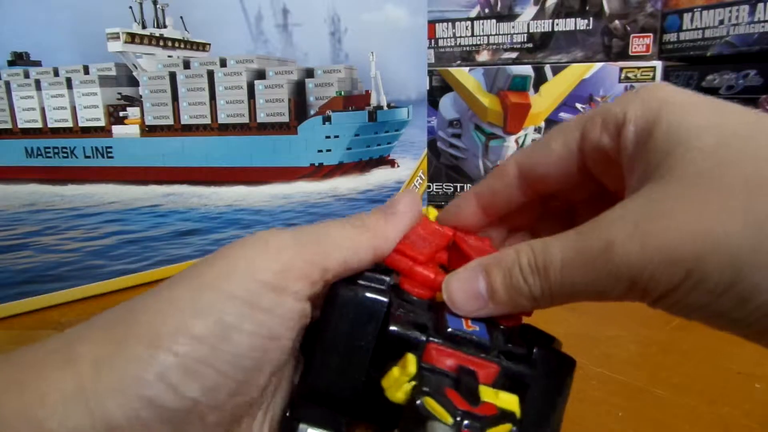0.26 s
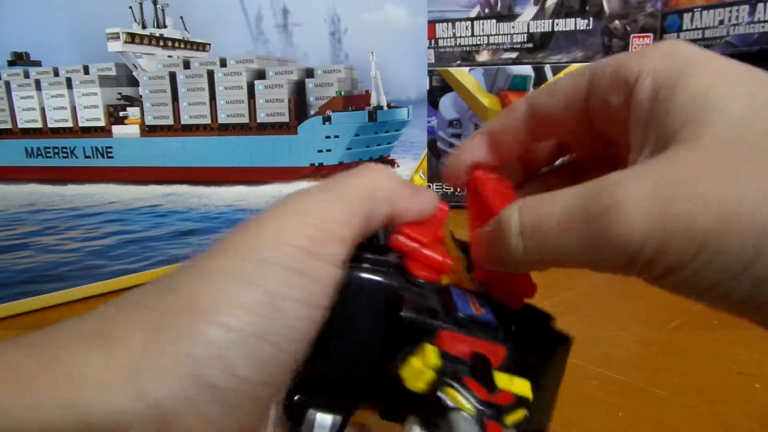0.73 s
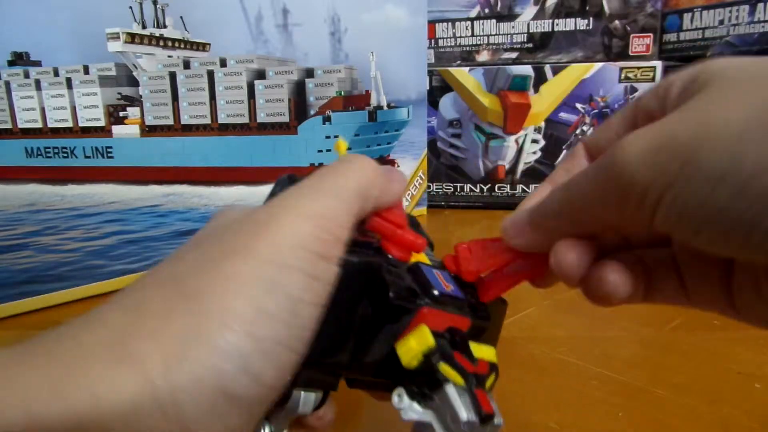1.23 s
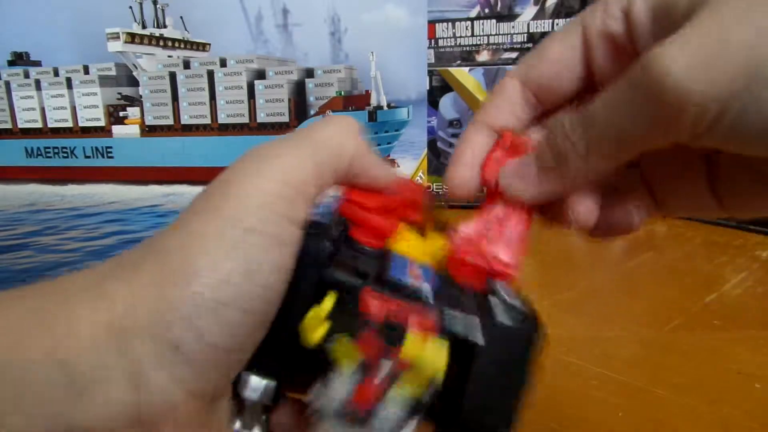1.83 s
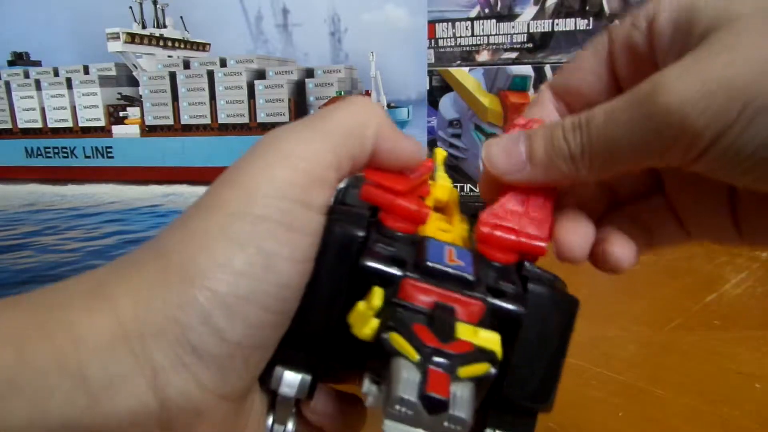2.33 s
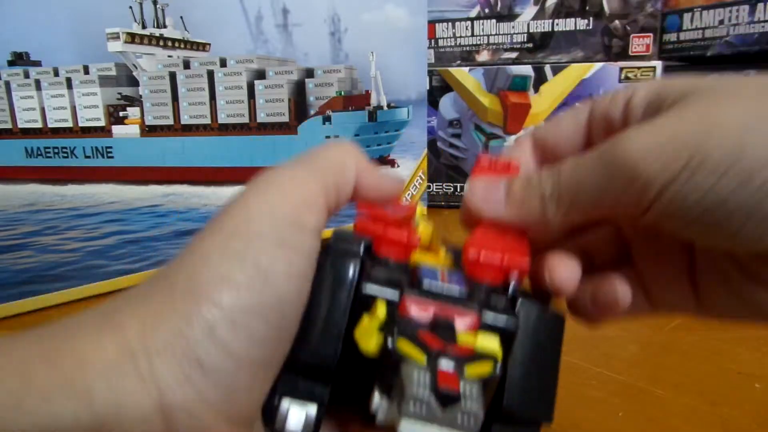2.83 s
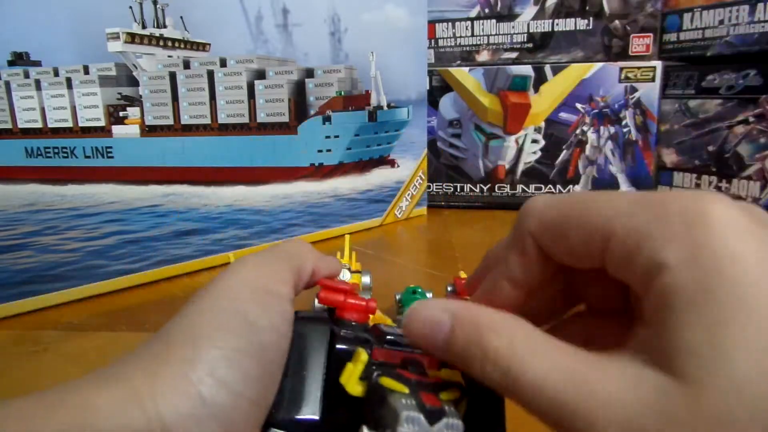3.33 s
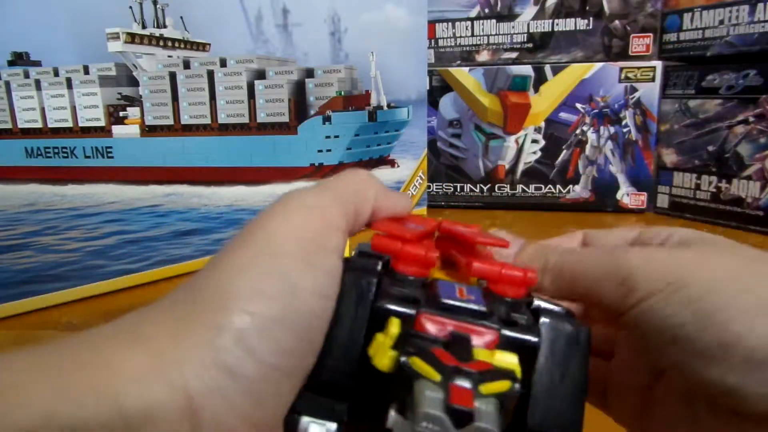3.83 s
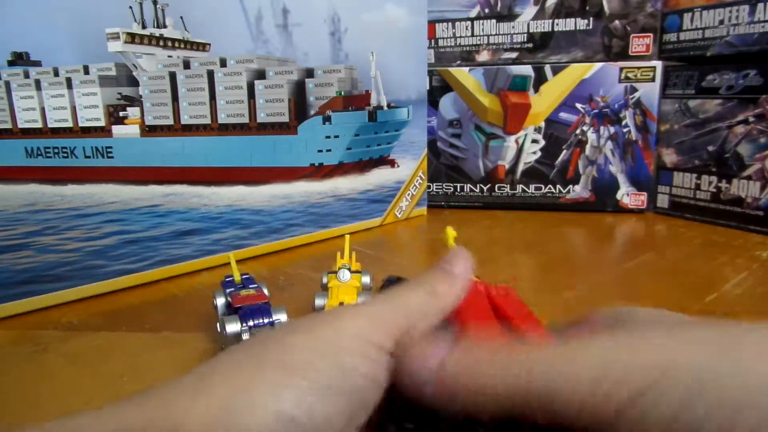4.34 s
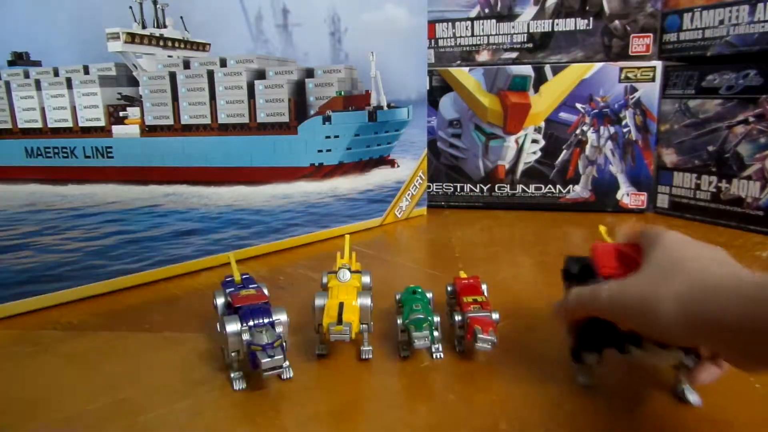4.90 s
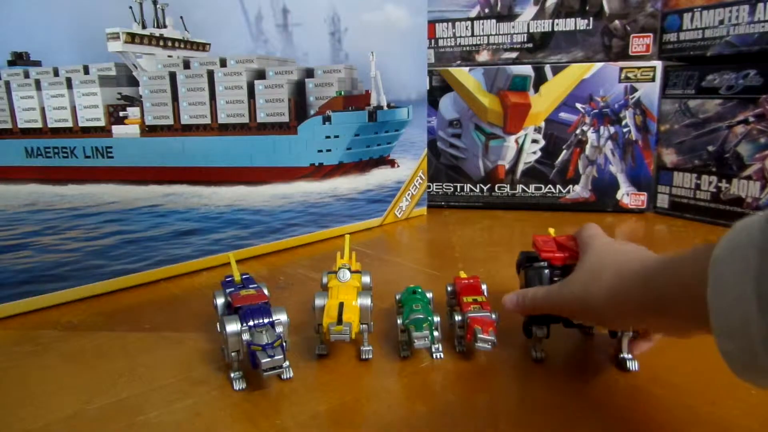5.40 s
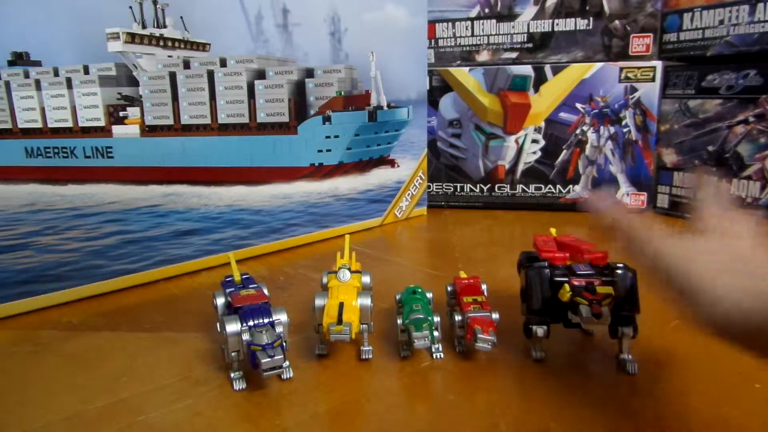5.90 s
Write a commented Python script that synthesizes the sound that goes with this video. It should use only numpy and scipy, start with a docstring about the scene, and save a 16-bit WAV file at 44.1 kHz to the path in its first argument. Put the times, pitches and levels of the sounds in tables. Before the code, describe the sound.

Close small plastic clicks and faint finger rubbing, a sharp loud snap, a few softer clicks, then hollow wooden knocks with a tiny low squeak.

```python
"""Folding a plastic toy and standing it on a table

Hands fold a hard plastic toy close to a camera: its joints tick and click, and one part snaps home loudly.
Each click is a burst of noise with ringing shell tones; rubbing fingers are noise with tiny catches.
The toy is then stood on a wooden table: its feet knock (ringing wood tones), skid with a low squeak and settle.
A small room answers clicks and knocks; a noise suppressor lets the hiss up after sounds and slowly shuts."""
import sys
import numpy as np
from scipy import signal
from scipy.fft import rfft, irfft, next_fast_len
from scipy.io import wavfile
from scipy.ndimage import uniform_filter1d, map_coordinates

SR = 44100
rng = np.random.default_rng(int(sys.argv[2]) if len(sys.argv) > 2 else 0)


def wav_out(sig):
    """Save sig, one row per channel (or a flat mono array), as 16-bit PCM at SR to the path in sys.argv[1]."""
    wavfile.write(sys.argv[1], SR, np.round(np.clip(np.atleast_2d(sig).T, -1, 1) * 32767).astype(np.int16))


N = 271523  # length in samples

# Fingers rubbing over the toy. Each row: start in seconds, length in seconds,
# level in dB (before the function that uses it adds its own level).
STROKES = [(0, 0.016, -52.5), (.06, 0.055, -60.5), (.27, 0.053, -69), (.58, 0.5, -59.5),
           (1.27, 0.0086, -60.5), (1.45, 0.19, -61.5), (2.0, 0.14, -72), (3.05, 0.65, -64),
           (4.28, 0.15, -60.5), (4.58, .12, -60)]
# Feet dragging over the table. Each row: start in seconds, length in seconds,
# rumble level in dB, scrape level in dB (both before an overall level is added).
DRAGS = [(5.02, 0.33, -44, -55.5), (5.44, .12, -60.5, -67), (5.777, 0.093, -51, -60.5)]


def amp(db):
    """Turn decibels into a gain."""
    return 10 ** (np.asarray(db) / 20)


def unit(x):
    """Scale to an average (rms) strength of 1."""
    return x / np.sqrt(np.mean(x ** 2) + 1e-20)


def strike(x, length):
    """Scale a blow to rms 1 over its first length seconds."""
    return x / np.sqrt(np.mean(x[:round(length * SR)] ** 2))


def along(points, hz):
    """Read a curve of (Hz, value) points on a logarithmic pitch axis."""
    point_hz, value = np.transpose(points)
    return np.interp(np.log(hz + 1), np.log(point_hz + 1), value)


def curves(rows):
    """One value per sample for each column; the last becomes a gain, silent outside the rows."""
    s, *columns, db = np.transpose(rows)
    t = np.arange(N) / SR
    inside = (t >= s[0]) * (t <= s[-1])
    return [np.interp(t, s, column) for column in columns] + [amp(np.interp(t, s, db)) * inside]


def filtered(x, response):
    """Multiply the spectrum of x by a response that depends on frequency."""
    m = next_fast_len(len(x) + 8192)
    return irfft(rfft(x, m) * response(np.fft.rfftfreq(m, 1 / SR)), m)[:len(x)]


def coloured(x, gain_db, size=4096):
    """Colour a sound with a causal (minimum-phase) filter: nothing sounds before the blow."""
    cepstrum = irfft(np.log(amp(gain_db(np.fft.rfftfreq(size, 1 / SR)))))
    # folding the second half onto the first moves the response after time zero
    cepstrum[1:size // 2] *= 2
    cepstrum[size // 2 + 1:] = 0
    impulse = irfft(np.exp(rfft(cepstrum)))
    return signal.fftconvolve(x, impulse)[:len(x)]


def noise(spectrum):
    """Noise of rms 1 with the given spectrum."""
    return unit(filtered(rng.standard_normal(N), lambda hz: amp(along(spectrum, hz))))


def wobble(rate):
    """A smooth random curve with rate random points a second."""
    points = rng.standard_normal(int(N * rate / SR) + 4)
    return map_coordinates(points, [np.arange(N) * rate / SR])


def add(track, s, sound):
    """Mix a sound into the track at s seconds."""
    part = track[max(round(s * SR), 0):][:len(sound)]
    part += sound[:len(part)]


def slide_level(slides):
    """Gain of (start s, length s, dB) slides: each swells, holds and dies away."""
    attack_db_per_s, release_db_per_s = 898, 139
    t = np.arange(N) / SR
    level = np.zeros(N)
    for start, length, db in slides:
        before = np.maximum(start - t, 0)
        after = np.maximum(t - start - length, 0)
        level += amp(db - attack_db_per_s * before - release_db_per_s * after)
    return level


def in_room(x, wet_db, delay=.009):
    """Add the tail from nearby boxes and walls: noise whose pitches die at different speeds."""
    # How long the room rings. Each row: frequency in Hz, time to fall by 60 dB in seconds.
    room_decay = [(200, 0.1), (1500, 0.25), (5000, 0.2), (10000, 0.19), (15000, 0.035)]
    hz, t, z = signal.stft(rng.standard_normal(len(x)), SR, nperseg=256)
    tail = signal.istft(z * amp(-60 * t / along(room_decay, hz)[:, None]), SR)[1]
    tail = np.pad(tail / np.linalg.norm(tail), (round(delay * SR), 0))
    return x + amp(wet_db) * signal.fftconvolve(x, tail)[:len(x)]


def contact(hollow, bright, t60, ring_db=-19, ring_t60=0.036, spike_db=1, spike_t60=.0006,
            bounce=0.34, bounce_s=0.0031, hollow_db=1, mid_db=.5, bright_db=-0.5,
            cavity_hz=781, cavity_db=-35, cavity_t60=.28):
    """A spike, a dense crack, the shell's tones and its cavity, mirrored by the table a moment later."""
    # Tones of the toy's hollow shell. Each row: frequency in Hz (before detuning), relative level in dB.
    shell_tones = [(1700, -5), (1980, -2), (2260, -1), (2430, -2), (3090, -2), (3260, 0), (3420, -2),
                   (4050, -1), (4115, 0), (4190, -1), (4550, 0), (4620, 0), (4920, -2), (5300, -4),
                   (5710, -2), (6350, -2), (6830, -4), (7200, -3), (7620, -3), (8310, -4), (9580, -4),
                   (9770, -2), (10180, -1)]
    # Colour of plastic on plastic. Each row: frequency in Hz, relative level in dB per Hz.
    crack_colour = [(40, -27.5), (150, -22.5), (400, -24), (1000, -19.5), (1350, -8.5), (1850, -3.5),
                    (2600, -3), (3300, -1), (4100, -1.5), (5000, -2.5), (6400, 0), (8000, -1.5),
                    (10400, 0.5), (12000, -14), (16000, -19)]
    t = np.arange(SR // 3) / SR
    # every t60 is the time in seconds to fall by 60 dB
    crack_fade = amp(-60 * t / t60) + amp(spike_db - 60 * t / spike_t60)
    crack = rng.standard_normal(len(t)) * crack_fade

    # the changing grip detunes the shell a little from contact to contact
    hz, db = np.transpose(shell_tones)[:, :, None]
    pitch = hz * (1 + rng.normal(0, .002, hz.shape))
    start_phase = rng.random(hz.shape)
    modes = np.sum(amp(db) * np.sin(2 * np.pi * (pitch * t + start_phase)), axis=0)
    ring = modes * amp(ring_db - 60 * t / ring_t60)
    cavity = amp(cavity_db - 60 * t / cavity_t60) * np.sin(2 * np.pi * cavity_hz * t)

    hit = crack + ring + cavity
    mirrored = np.pad(hit, (round(bounce_s * SR), 0))[:len(t)]
    hit = strike(hit + bounce * mirrored, 0.005)
    # large parts sound hollow, small catches bright
    size = [(1700, hollow + hollow_db), (3300, mid_db), (4700, 0.0049), (7200, bright + bright_db)]
    return coloured(hit, lambda f: along(crack_colour, f) + along(size, f))


def clicks(level_db=9.0, wet_db=-14.0):
    """The toy's joints click; each contact is followed 12 ms later by a softer echo."""
    # Plastic contacts. Each row: start in seconds, level around 4 kHz in dB (before level_db is added),
    # hollow (low) band in relative dB and bright (high) band in relative dB (both before contact()'s trims),
    # time for the crack to fall by 60 dB in seconds.
    plastic_contacts = [(0.098, -51, -8, 2.5, 0.022), (0.2166, -49, 16, -12, 0.013),
                        (0.246, -51, 9, -15, 0.019), (0.2893, -45.5, 3.5, -9, 0.01),
                        (0.3008, -44, -2, -6, 0.056), (0.4383, -60.5, 24, -15, 0.0066),
                        (1.1395, -59, 12, 8, 0.02), (1.43, -39.5, -8.5, 8.5, 0.011),
                        (1.4915, -44.5, -8, -2, 0.018), (1.497, -46.5, -1, -1, 0.01),
                        (1.5582, -46.5, 10, 2, 0.051), (1.706, -53.5, 3, -8, 0.015),
                        (1.9008, -46.5, 14, 3, 0.052), (1.957, -38.5, 8.5, 0.5, 0.024),
                        (1.982, -43.5, 8, -12, 0.023), (2.0721, -48.5, -15, -6, 0.012),
                        (2.5846, -57, 12.5, 4.5, 0.011), (3.4885, -58.5, -4, 9.5, 0.018),
                        (3.796, -12.5, -2.5, -1.5, 0.025), (3.8259, -22.5, -4, -13.5, 0.036),
                        (4.1347, -38, 0.5, -14, 0.016), (4.177, -44, 10, 1, 0.019),
                        (4.2525, -50, -1, -0.5, 0.016), (4.344, -44.5, 8.5, -24, 0.024),
                        (4.6054, -55.5, 10, -6, 0.019), (4.698, -50.5, 16.5, -26.5, 0.051),
                        (5.0547, -48.5, 5, -4.5, 0.075), (5.225, -37.5, 6.5, -7.5, 0.029),
                        (5.2644, -37.5, 5, 1.5, 0.025), (5.519, -45.5, 10, -16, 0.076),
                        (6.0559, -75, 0, 25, 0.012)]
    echo_s, echo_loss_db = 0.012, 15
    out = np.zeros(N)
    for s, contact_db, hollow, bright, t60 in plastic_contacts:
        for delay, loss_db in [(0, 0), (echo_s, echo_loss_db)]:
            click = in_room(contact(hollow, bright, t60), wet_db)
            add(out, s + delay, amp(contact_db + level_db - loss_db) * click)
    return out


def faint_ticks(count=30, over_stroke_db=5):
    """Loose parts tick at random moments, louder where the fingers rub harder."""
    out, stroke = np.zeros(N), slide_level(STROKES)
    moments, sizes = rng.integers(N, size=count), rng.uniform(.5, 1, count)
    for when, size in zip(moments, sizes):
        tick = contact(hollow=3, bright=0, t60=.014)
        add(out, when / SR, size * stroke[when] * amp(over_stroke_db) * tick)
    return out


def table_ring(hard_db, thud_db=-1, thud_t60=0.069, low_hz=130, attack_s=0.00069):
    """The table top struck once: fading tones and a noisy thud; a hard blow wakes its upper tones."""
    # Tones of the table top. Each row: frequency in Hz, relative level in dB (before hardness and chance
    # change it), time to fall by 60 dB in seconds.
    table_tones = [(154, -17, 0.1), (204.5, 1.5, 0.1), (253.8, 0, 0.097), (390, 4, 0.059),
                   (423.2, 1.5, 0.081), (626, -6, 0.082), (687, -10.5, 0.082), (736, -12.5, 0.11),
                   (837, -12.5, 0.17), (1091, -15.5, 0.15), (1306, -11.5, 0.047), (1558, -18.5, 0.11),
                   (2100, -10, 0.047)]
    # The wood's many short tones, blurred into noise. Each row: frequency in Hz,
    # relative level in dB per Hz (before hardness changes it).
    thud_colour = [(50, -26), (110, -12), (200, -2), (450, -2), (600, -2.5), (880, -9), (1200, -22),
                   (2500, -13), (6000, -50.5)]
    t = np.arange(SR // 3) / SR
    hz, db, t60 = np.transpose(table_tones)[:, :, None]
    hardness = [(450, 0), (1200, hard_db)]
    # each tone is excited a little differently by every blow
    strength = db + along(hardness, hz) + rng.normal(0, 3.04, hz.shape)
    ring = np.sum(amp(strength - 60 * t / t60) * np.sin(2 * np.pi * hz * t), axis=0)

    thud = unit(filtered(rng.standard_normal(len(t)),
                         lambda f: amp(along(thud_colour, f) + along(hardness, f))))
    fading_thud = thud * amp(thud_db - 60 * t / thud_t60)
    blow = (ring + fading_thud) * (1 - np.exp(-t / attack_s))
    # a high-pass removes the offset and deep bass below low_hz
    high_pass = signal.butter(3, low_hz, "high", fs=SR, output="sos")
    return strike(signal.sosfilt(high_pass, blow), 0.009)


def knocks(level_db=0.0, hard_db=8):
    """The feet land one after another and rock to rest, each blow ringing the table top."""
    # Feet on the table. Each row: start in seconds, level in dB (before level_db is added),
    # hardness as dB of the table's upper tones (before hard_db is added).
    foot_blows = [(5.013, -42.5, -10), (5.0516, -23.5, -12), (5.2639, -18.5, -6.5), (5.28, -36.5, 19),
                  (5.4344, -42.5, -12), (5.4864, -41.5, -11), (5.5238, -39.5, -7), (5.8348, -34.5, -43),
                  (5.903, -45.5, -32)]
    out = np.zeros(N)
    for s, blow_db, hardness in foot_blows:
        knock = in_room(table_ring(hardness + hard_db), wet_db=-12.5)
        add(out, s, amp(blow_db + level_db) * knock)
    return out


def skid(second_db=-23, third_db=-32, fourth_db=-29, jitter=0.0192):
    """A foot sticks and slips, mostly faster and faster: an almost pure low squeak."""
    # A foot skidding on the varnish. Each row: time in seconds, slips a second (before jitter), level in dB.
    skid_path = [(5.17, 260, -66), (5.195, 325, -40), (5.206, 350, -37), (5.213, 346, -26),
                 (5.236, 358, -28), (5.248, 410, -33.5), (5.258, 410, -43)]
    rate, level = curves(skid_path)
    phase = 2 * np.pi * np.cumsum(rate * (1 + jitter * wobble(120))) / SR
    harmonics_db = [0, second_db, third_db, fourth_db]
    squeak = sum(amp(db) * np.sin(k * phase) for k, db in enumerate(harmonics_db, 1))
    return level * unit(squeak)


def rubbing(rub_db=1, ticks_per_s=70, tick_db=-6):
    """Friction of fingers on plastic and of feet on the table: uneven noise with tiny, short catches."""
    # Colour of the rubbing. Each row: frequency in Hz, relative level in dB per Hz.
    rustle_colour = [(30, -10.5), (150, 9.5), (600, -1), (2000, 1.5), (4000, -4), (7000, -3), (10000, -2),
                     (12500, -23.5), (16000, -21)]
    scrape = slide_level([(s, length, db) for s, length, _, db in DRAGS])
    starts = (rng.random(N) < ticks_per_s / SR) * rng.random(N)
    catches = unit(signal.lfilter([1], [1, -np.exp(-1 / (0.002 * SR))], starts))
    unevenness = amp(0.64 * wobble(42)) + amp(tick_db) * catches
    return amp(rub_db) * (slide_level(STROKES) + scrape) * noise(rustle_colour) * unevenness


def drag_rumble(drag_db=0):
    """Dragging feet shake the table: uneven noise rings the table top."""
    shake = slide_level([(s, length, db) for s, length, db, _ in DRAGS])
    judder = rng.standard_normal(N) * amp(1.7 * wobble(60))
    rumble = unit(signal.fftconvolve(judder, table_ring(hard_db=-6))[:N])
    return amp(drag_db) * shake * rumble


def background(hiss_db=-56.0, hum_db=-66, hum_hz=69.6):
    """Microphone hiss (coloured noise) and a low room hum whose pitch and level waver."""
    # Colour of the hiss. Each row: frequency in Hz, relative level in dB per Hz.
    hiss_colour = [(20, -10.5), (45, -1.5), (75, 1.5), (110, 0), (200, 0), (400, -1.5), (700, -2.5),
                   (1400, -7), (3000, -9.5), (6000, -13), (10300, -12), (12500, -18), (15500, -23)]
    hum_phase = 2 * np.pi * hum_hz * np.arange(N) / SR + 0.71 * wobble(6.5)
    hum = np.sin(hum_phase) * amp(1.9 * wobble(8))
    return amp(hiss_db) * noise(hiss_colour) + amp(hum_db) * unit(hum)


def scene():
    """Toy, table and room at one microphone."""
    toy = clicks() + faint_ticks()
    table = knocks() + skid()
    friction = rubbing() + drag_rumble()
    return (toy + table + friction + background())[None]


def suppressor(x, shut_db=-50, span_db=12, depth_db=10, release=24, hold_db=4, size=256):
    """Turn quiet passages down; a sound opens the gain at once, and it sinks back at release dB a second."""
    level_db = 10 * np.log10(np.abs(uniform_filter1d(x ** 2, size)) + 1e-12)
    opening = np.maximum(level_db - shut_db, 0) / span_db
    # a very loud sound overcharges the detector, which then stays open longer
    wanted_db = np.interp(opening, [0, 1, 2, 3], [0, depth_db, depth_db, depth_db + hold_db])
    # a running maximum on a sloping line: jumps up freely, falls only at the release speed
    sink_db = release * np.arange(N) / SR
    open_db = np.maximum.accumulate(wanted_db + sink_db) - sink_db
    return x * amp(np.minimum(open_db - depth_db, 0))


def record(dry):
    """The camera suppresses noise, rounds off the highest peaks and cuts the top of the treble."""
    ceiling, top_hz = .66, 16300  # ceiling: the level that peaks bend towards
    x = suppressor(dry[0])
    x = x / (1 + (x / ceiling) ** 6) ** (1 / 6)
    return filtered(x, lambda hz: hz < top_hz)[None]


dry = scene()
out = record(dry)
wav_out(out)
```